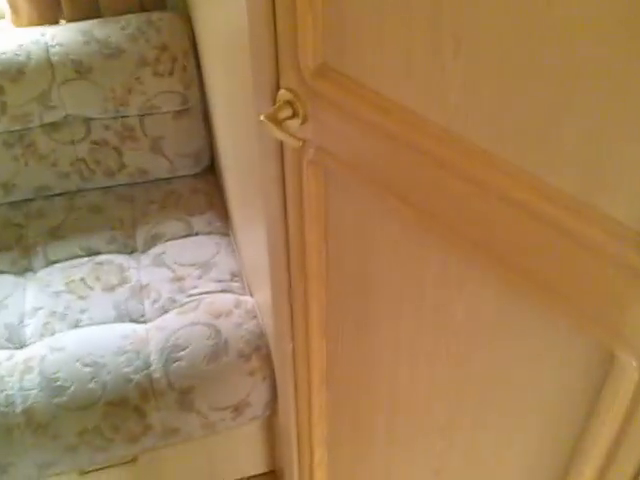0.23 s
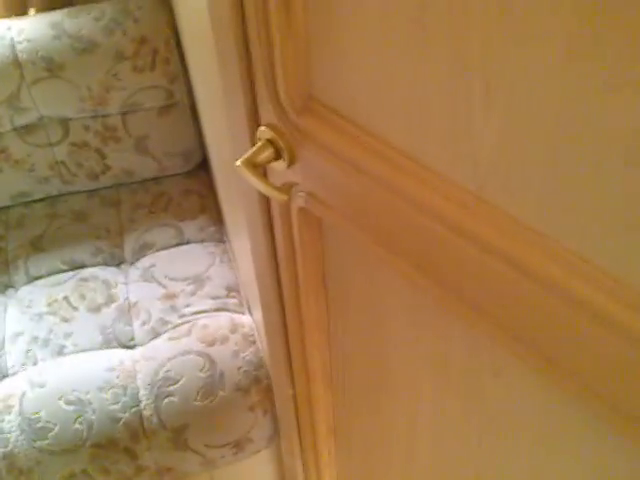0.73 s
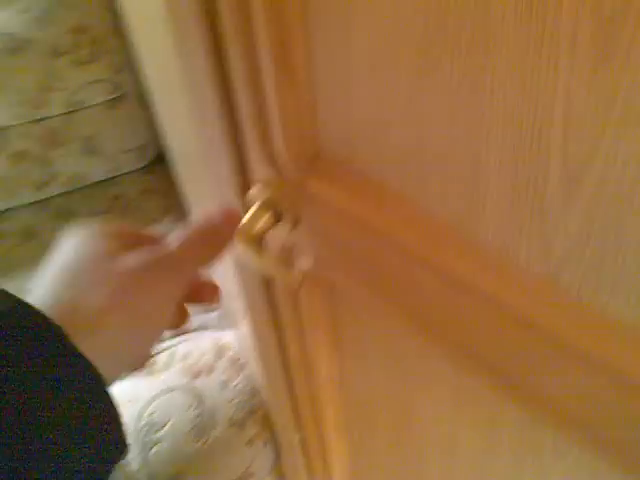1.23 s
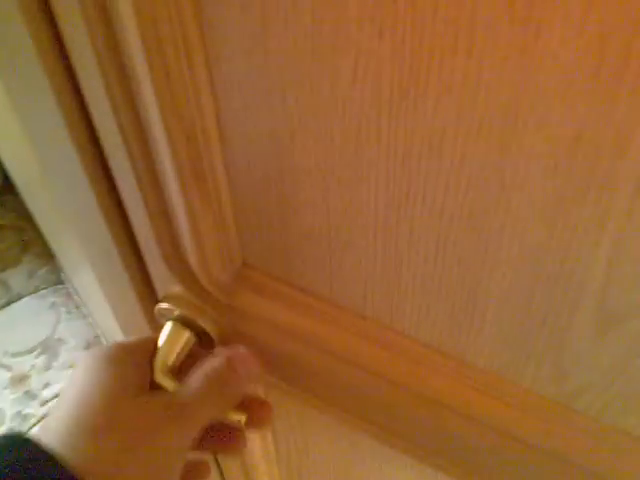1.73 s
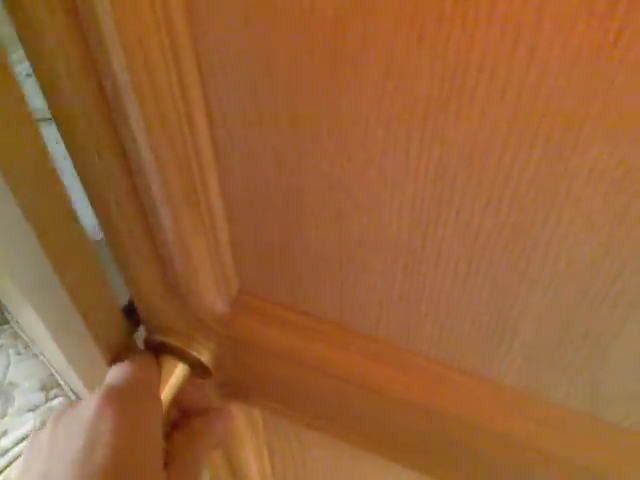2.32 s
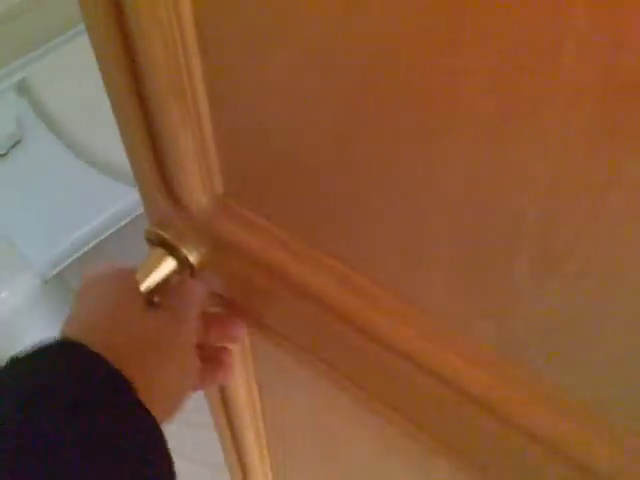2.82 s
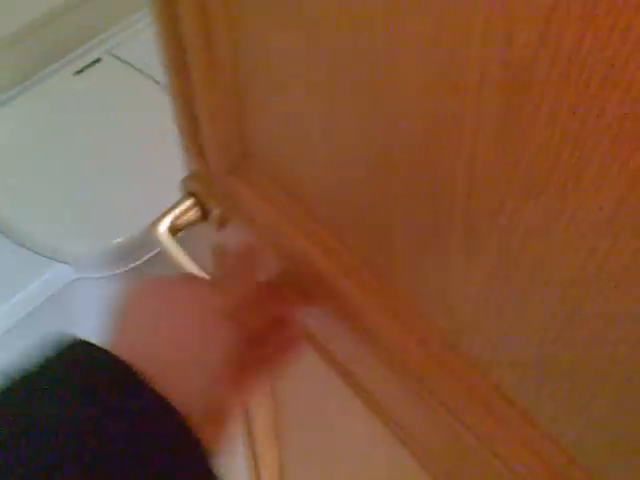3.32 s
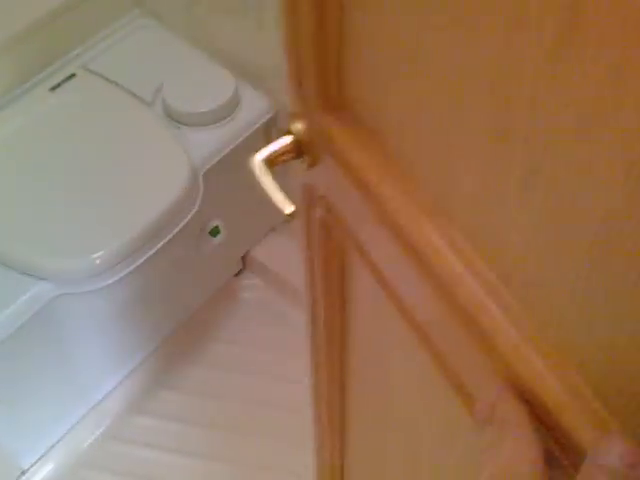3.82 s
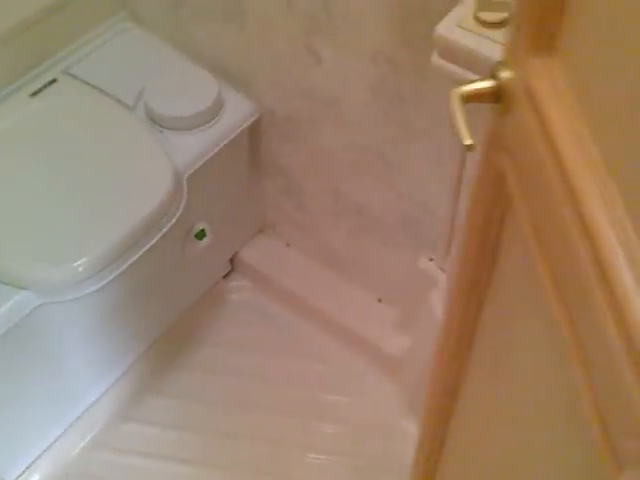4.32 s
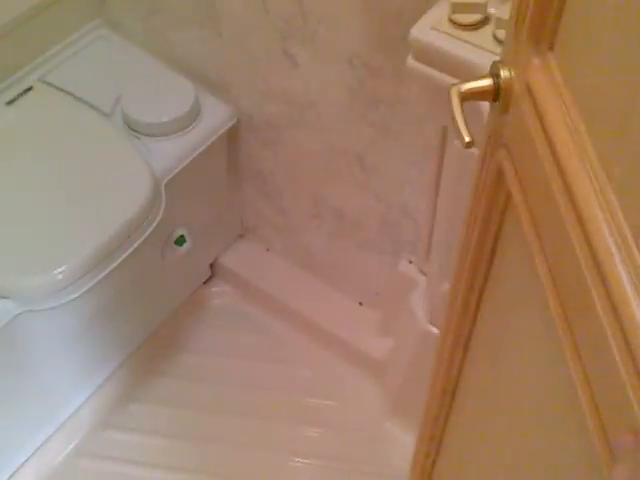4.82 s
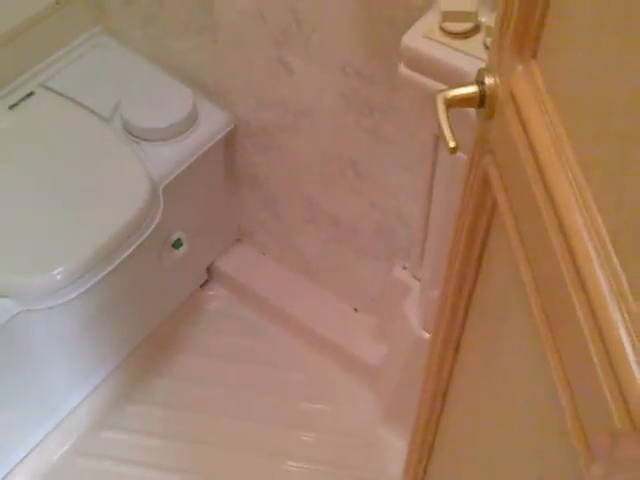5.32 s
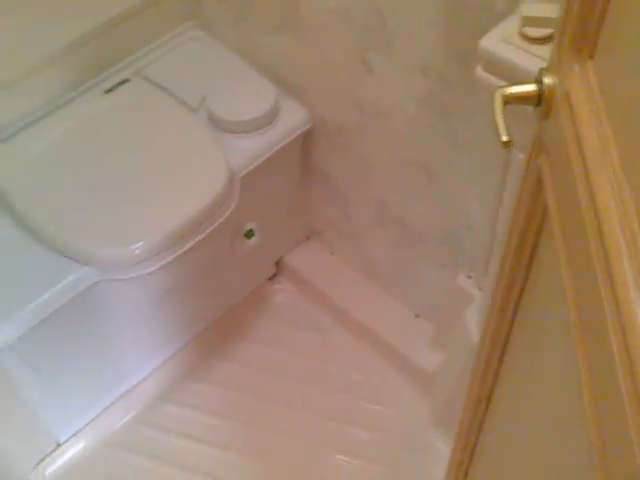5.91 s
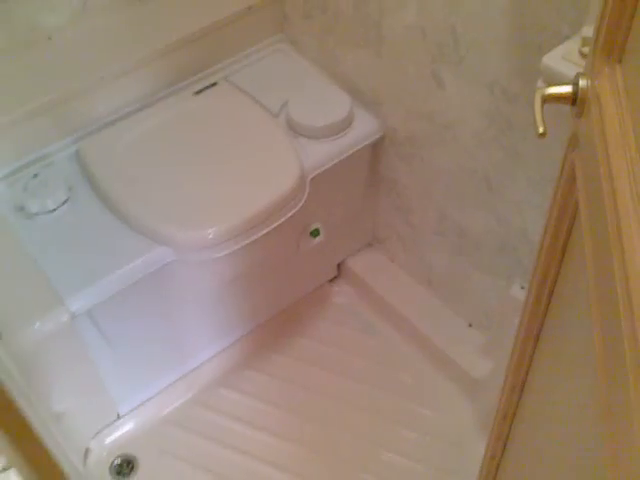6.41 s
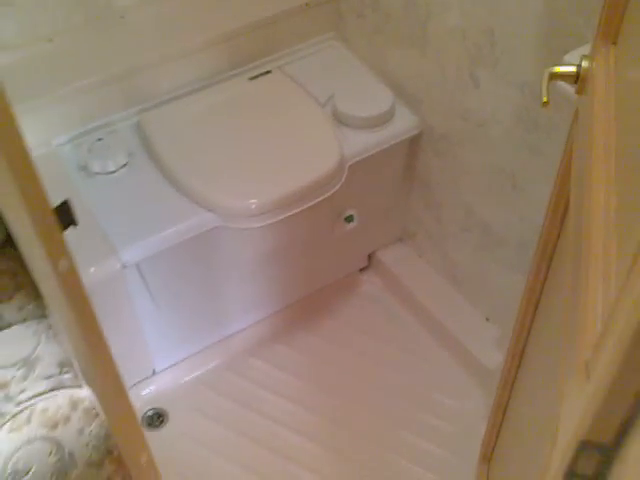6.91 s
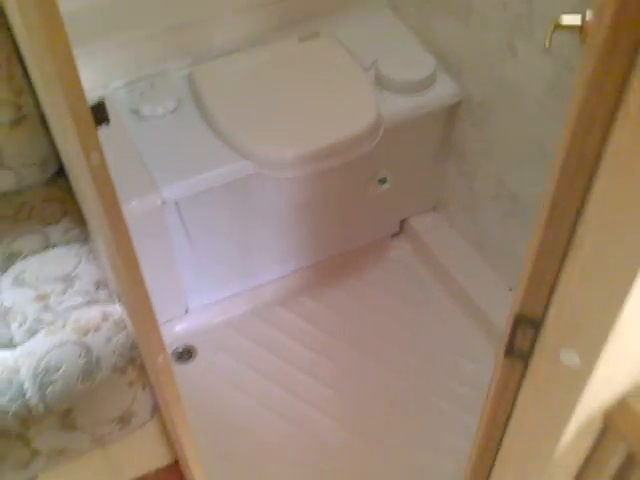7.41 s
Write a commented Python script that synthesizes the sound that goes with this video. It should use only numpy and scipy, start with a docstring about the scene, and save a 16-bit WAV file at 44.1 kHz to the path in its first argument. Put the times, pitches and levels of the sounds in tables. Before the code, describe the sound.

Inside a small caravan, close to a hand-held microphone, cloth rustles and fingers scrape and tick on a plastic case. A lever latch clacks, the light wooden door knocks and drones faintly on its hinges, then bangs hard against its stop, bouncing and shuddering. After a lull, a low floor flex and soft rustle return, with a faint squeak and small knocks.

```python
"""Inside a caravan sleeves rustle as band-shaped friction noise over the rumble of a grip.
A finger first strokes a hand-held camera's plastic case, which ticks as dispersed bending waves.
Latch and lever then clack as damped rings, and the hinges of a light hollow door drone as filtered noise.
The door bangs on its stop, bounces and shudders: decaying noise through its resonances, with low tones.
The rustle nearly vanishes after the bang, then returns as the floor flexes under a step, a low unsteady
tone; a faint squeak follows. A soft ceiling flattens the peaks."""
import sys
import numpy as np
from scipy.fft import rfft, irfft, next_fast_len
from scipy.io import wavfile
from scipy.ndimage import uniform_filter1d, map_coordinates

SR = 44100
rng = np.random.default_rng(int(sys.argv[2]) if len(sys.argv) > 2 else 0)


def file_out(sig):
    """Save sig as 16-bit WAV at sys.argv[1]."""
    # one column per channel
    cols = np.atleast_2d(sig).T
    # limit, then scale
    lim = np.clip(cols, -1, 1)
    pcm = np.round(lim * 32767).astype(np.int16)
    wavfile.write(sys.argv[1], SR, pcm)


N = 338467  # length [samples]

# Rms levels of rustle and scrape, sinking after the bang: (time [s], sleeve level [dB], scrape level [dB])
FRICTION_LEVELS = [(0, -52, -52), (.13, -58.5, -52.5), (.17, -43, -43.5), (.31, -55, -54.5),
                   (.335, -40, -50.5), (.4, -41, -51), (.49, -40, -42), (.515, -39, -40.5),
                   (.55, -36, -30.5), (.64, -43.5, -45.5), (.7, -40.5, -39.5), (.745, -38, -24.5),
                   (.81, -38, -29), (.87, -46.5, -35.5), (1.01, -62, -61), (1.15, -52.5, -59),
                   (1.34, -49, -45.5), (1.48, -50.5, -55), (1.64, -54, -51), (1.89, -48.5, -48.5),
                   (2.13, -48.5, -49.5), (2.24, -47.5, -37), (2.37, -63, -54), (2.77, -44, -48.5),
                   (3.09, -57, -52), (3.32, -55, -56.5), (3.5, -56, -57), (3.56, -40, -46),
                   (3.66, -43, -58), (3.86, -48.5, -58.5), (3.93, -52, -57.5), (4.03, -45.5, -53),
                   (4.16, -50, -53.5), (4.42, -54, -59.5), (4.62, -87, -76.5), (4.93, -72, -80.5),
                   (5.5, -75.5, -67), (5.85, -70, -75), (6.126, -59, -72.5), (6.44, -47, -51),
                   (6.586, -55, -62), (6.83, -52.5, -56.5), (7.03, -56, -62), (7.085, -49, -58),
                   (7.13, -58.5, -62), (7.24, -50, -58), (7.38, -56.5, -63), (7.67, -57, -64)]
# Relative spectrum of the grip's rumble: (frequency [Hz], density [dB per Hz])
RUMBLE_SPECTRUM = [(12, -32), (20, 3), (38, -14), (54, -4), (64, -7.5), (92, -2.5), (190, -9.5),
                   (304, -10.5), (334, -11.5), (372, -18.5), (500, -23.5), (650, -50), (1100, -120)]
# Relative spectrum of sleeve cloth: (frequency [Hz], density [dB per Hz])
CLOTH_SPECTRUM = [(530, -33), (900, -5.5), (1850, -3), (2400, -0.5), (3000, -1), (3570, -5.5), (4540, -11),
                  (9000, -37), (11700, -52), (19800, -120)]
# Relative spectrum of the fizz above sleeve and grip: (frequency [Hz], density [dB per Hz])
FIZZ_SPECTRUM = [(2650, -24), (4500, 4.5), (5680, 1), (6190, 0.5), (9820, -14), (15200, -17),
                 (16000, -32.5)]
# Relative spectrum of scraping fingers: (frequency [Hz], density [dB per Hz])
SCRAPE_SPECTRUM = [(210, -42), (350, -7), (394, 0), (432, -5.5), (630, -2.5), (881, -6.5), (1060, -8),
                   (2600, -17.5), (3380, -47.5), (5720, -120)]
# Quick finger strokes over the case: (time [s], length [s], level before the envelope [dB])
STROKES = [(0.156, 0.101, -42.5)]
# Relative spectrum of a stroke: (frequency [Hz], density [dB per Hz])
STROKE_SPECTRUM = [(500, -23.5), (1200, -4), (1800, 2.5), (2600, -3.5), (3300, -14.5), (4200, -2),
                   (5000, -11.5), (6000, -9.5), (7000, -25.5), (12000, -32.5), (16000, -58.5)]
# Weight shifts that flex the floor: (time [s], rms level [dB], hold [s], t60 [s])
FLOOR_STEPS = [(0.574, -33, .005, .12), (.81, -41, .02, .4), (1.274, -31, .005, 0.089),
               (1.385, -43, .01, 0.34), (6.402, -12.5, 0.0035, 0.17), (6.458, -25.5, .01, 0.32),
               (6.756, -42, 0.0069, .5)]
# Case ticks, clicking 2 ms after the time:
# (time [s], click peak [dB], thump over click [dB], click centre [Hz])
CASE_TICKS = [(0.205, -27, -14, 2010), (0.523, -33, 16, 970), (0.561, -16, -0.5, 764),
              (0.574, -5.5, -3, 777), (0.6, 2.5, -36, 2080), (0.692, -23.5, 1, 1040),
              (0.903, -7.5, -16, 1240), (1.046, -42.5, 12.5, 1250), (1.557, -17.5, 5.5, 1250),
              (1.599, -22.5, 6.5, 1210), (1.652, -21, 6.5, 1990), (1.697, -23, 7.5, 890),
              (1.79, -58, 31.5, 2750), (1.804, -27, 9.5, 2360), (1.847, -23, 5, 1230),
              (1.92, -25.5, 7.5, 1220), (2.059, -26.5, 8.5, 1060), (2.162, -41, 10, 1208),
              (2.174, -26.5, 11, 830), (2.878, -18.5, 0.5, 1580), (7.184, -31.5, 10.5, 2080)]
# Resonances of the case: (frequency [Hz], width [Hz], mean gain [dB])
CASE_MODES = [(1065, 380, 16), (2008, 780, 12.5), (2650, 300, 12), (3187, 350, 13), (4950, 1500, -2),
              (8050, 1400, 0)]
# Latch and lever clacks, and a faint late squeak:
# (time [s], nominal level [dB], favoured low ring [Hz], upper rings' gain [dB])
CLACKS_AND_SQUEAK = [(2.229, -8, 1277, -4.5), (2.248, -53, 1320, -16), (2.268, -40, 1280, -12),
                     (2.282, -34, 1340, -18), (2.305, -31, 1320, -14), (2.324, -19, 1460, -13),
                     (2.612, -25, 1110, -8), (2.632, -30, 1090, -11), (3.042, -23.5, 1380, 4),
                     (3.074, -41, 1305, 9), (3.096, -29.5, 1286, 7.5), (3.578, -30, 1360, -40),
                     (7.233, -62, 1288, 24)]
# Rings that clacks and squeak share: (frequency [Hz], mean level [dB], t60 [s])
LATCH_RINGS = [(1110, -2, 0.051), (1282, 7, 0.017), (1427, -10, 0.098), (2230, 4, 0.014), (2574, -3, 0.03),
               (2960, -9, 0.021), (3060, 1.5, 0.0095), (4650, -15, 0.012), (6800, -48, 0.0064)]
# Drone while the hinges drag: (time [s], rms level [dB])
HINGE_LEVELS = [(2.25, -43), (2.486, -53), (2.902, -46), (3.054, -42.5), (3.11, -34.5), (3.2, -49),
                (3.271, -39.5), (3.33, -60)]
# Relative spectrum of the drone: (frequency [Hz], density [dB per Hz])
DRONE_SPECTRUM = [(170, -54), (195, -3), (230, -20), (315, -16), (340, -3.5), (365, -23.5), (420, -64.5)]
# Jolts that flex the door leaf: (time [s], rms level [dB], hold [s], t60 [s])
LEAF_JOLTS = [(1.557, -38, .01, 0.24), (1.7, -32, 0.0043, 0.12), (1.804, -42, 0.19, .2),
              (2.102, -32, .03, 0.65), (2.261, -15, 0.0037, 0.14), (2.356, -24.5, .005, 0.12),
              (2.45, -32.5, .005, .25), (2.552, -33, .005, 0.45), (2.69, -28.5, 0.028, 0.37),
              (2.785, -29, 0.037, 0.33), (2.915, -29.5, 0.023, .3), (3.108, -31.5, .005, 1.8),
              (3.694, -37, .005, 0.44), (4.058, -43, 0.0094, 0.17), (4.243, -42, .01, 0.16),
              (4.42, -8, 0.011, 0.66), (4.965, -20, .02, 0.58), (5.031, -17.5, 0.0051, 0.2),
              (5.146, -20, 0.0056, 0.16), (5.215, -22.5, .22, 0.5), (5.657, -35.5, .16, 0.83),
              (7.25, -38.5, 0.012, 0.68)]
# Round hollow thumps of contacts, slam and bounces, each at its own pitch:
# (time of peak [s], frequency [Hz], peak [dB], t60 [s])
ROUND_THUMPS = [(2.26, 188.5, -24.5, 0.32), (3.546, 282, -17, 0.067), (3.585, 325, -23.5, 0.1),
                (4.051, 250, -36.5, 0.15), (4.45, 150.1, -11.5, 0.48), (5.031, 201, -24, 0.11),
                (5.124, 206, -18, 0.1), (5.185, 203, -21.5, 0.082), (5.212, 199, -22.5, 0.14),
                (6.399, 121, -33.5, 0.16), (7.22, 96, -35, 0.43), (7.29, 302, -30.5, 0.066),
                (7.52, 304, -27, 0.082)]
# Interval of the bounces on the stop: (start [s], end [s])
STOP_INTERVAL = (4.9, 5.9)
# Panel modes the bounces strike: (frequency [Hz], mean level over the knock's nominal one [dB], t60 [s])
STOP_MODES = [(520, -5, 0.087), (931, -6, 0.063), (1426, -14, 0.056)]
# Knocks on door and frame: (time [s], nominal level [dB], nominal thud over it [dB], thud centre [Hz],
# nominal bite over it [dB], nominal t60 near 1 kHz [s])
DOOR_KNOCKS = [(1.259, -29, 7.5, 183, -24, 0.064), (1.353, -25, -8.5, 232, -1.5, .21),
               (2.242, -29.5, -2.5, 175, 6, 0.4), (2.383, -34.5, -29, 143, 4, 0.068),
               (2.61, -35, 4.5, 146, 1, 0.2), (3.045, -26.5, 1, 327, 3.5, 0.17),
               (3.1, -26, -11, 196, 1.5, 0.21), (3.218, -35.5, -7, 197, 3.5, 0.23),
               (3.364, -37, -5, 170, -16, 0.045), (3.524, -27, 6.5, 305, -16, 0.14),
               (3.543, -39.5, 14, 298, -16, 0.17), (3.575, -31, -0.5, 315, -14, 0.29),
               (3.663, -32.5, 1, 190, -11, 0.073), (4.384, 0, -8, 170, -2.5, 0.065),
               (4.399, -5.5, -9, 170, -2.5, 0.072), (4.412, -4.5, -19.5, 359, -0.5, 0.076),
               (4.423, -4, -20.5, 359, -2.5, 0.049), (4.439, -7.5, -6, 156, -1.5, 0.11),
               (4.48, -13.5, -9, 203, -1.5, 0.12), (4.519, -25.5, 5, 157.5, -4, 0.2),
               (4.649, -46.5, 23, 147, -25.5, .13), (4.748, -65.5, 26, 218, -12, .13),
               (4.946, -21, -1.5, 159, -7, 0.19), (4.986, -23, -1, 302, -2.5, 0.12),
               (5.019, -36, 16, 205, -15, .13), (5.076, -58, 29, 205, -19.5, 0.4),
               (5.123, -22, 5, 210, -12, 0.15), (5.178, -29, 11, 208.5, -22, 0.17),
               (5.197, -29.5, 1.5, 200, -42, 0.15), (5.236, -36.5, -2.5, 248, -14.5, 0.093),
               (5.283, -26.5, 5.5, 490, -18.5, 0.18), (5.329, -33.5, 5.5, 142.3, -30.5, 0.13),
               (5.385, -26.5, -10.5, 163.7, -24.5, 0.13), (5.418, -38, 0.5, 244, -41.5, 0.3),
               (5.46, -36, 7.5, 159, -28.5, 0.087), (5.501, -32, 9.5, 336, -22, .1),
               (5.583, -47, 20, 409, -37, .09), (5.63, -48, 10.5, 249.6, -38, 0.17),
               (5.744, -40.5, 3.5, 141.4, -47, .1), (5.775, -49.5, 7, 142.6, -23, 0.11),
               (6.393, -39, 6.5, 303, 7.5, 0.12), (7.284, -29.5, -0.5, 310, -4, .2),
               (7.512, -28.5, 0, 307, -4.5, 0.17)]
# Resonances of the hollow door: (frequency [Hz], width [Hz], gain added to the direct blow [dB])
DOOR_MODES = [(149.6, 30, 7.5), (200, 14, 12.5), (337.5, 21, 13), (502, 67, 12.5), (838, 89, 4.5),
              (930, 35, 8), (1225, 60, 4.5), (1430, 50, 5), (1810, 10, -2), (2180, 29, -9.5),
              (2770, 80, -2), (3920, 260, -4.5)]
# Relative spectrum of a hard knock: (frequency [Hz], density [dB per Hz])
BLOW_SPECTRUM = [(41, -32.5), (70, 19), (118, 2), (152, -4.5), (554, -18), (834, -13.5), (1170, -16.5),
                 (1470, -15.5), (6300, -29), (14900, -56), (16000, -71)]
# Damping of a knock: (frequency [Hz], factor on its nominal t60 [ratio])
DAMPING_FACTORS = [(100, 3), (400, 1.47), (1000, 1.04), (4000, 1.25), (12000, 0.98)]

FIZZ_UNDER_SLEEVE_DB, FIZZ_UNDER_GRIP_DB = 16, 22.5
# mean rumble at a scrape of -48.5 dB, its growth per dB of scrape, its random sway
RUMBLE_DB, RUMBLE_PER_DB, RUMBLE_SWAY_DB = -43.5, 0.6732, 4.5
# mean panel tremble at a scrape of -50 dB, its change per dB of scrape, its random sway
IDLE_DB, IDLE_PER_DB, IDLE_SWAY_DB = -56, -0.03, 4
FLOOR_HZ, LEAF_HZ, SWELL_S = 40.4, 51.4, .035
SPREAD = .095  # dispersion of the bending wave [s*sqrt(Hz)]
THUMP_SWELL_CYCLES = 4.5
# nominal treble of a knock is the larger of two lines: one rising with its level, one with its bite
HARD_TREBLE_DB, TREBLE_PER_DB = -9, 1.1
SOFT_TREBLE_DB, TREBLE_PER_BITE = -33.5, 1
CEILING, TOP_HZ = .74, 15900  # soft limit [full scale] and band limit


def amp(db):
    """Level is logarithmic: 20 dB is a factor of ten in amplitude."""
    return 10 ** (np.asarray(db) / 20)


def unit(x):
    """Normalisation to an rms of 1."""
    return x / np.sqrt(np.mean(x ** 2) + 1e-20)


def along(points, hz):
    """Interpolation of (frequency [Hz], value) points on a logarithmic frequency axis."""
    f, v = np.transpose(points)
    return np.interp(np.log(hz + 1), np.log(f + 1), v)


def curves(rows):
    """Linear interpolation in time: one curve for each column after the first."""
    s, *columns = np.transpose(rows)
    return [np.interp(np.arange(N) / SR, s, column) for column in columns]


def wobble(rate):
    """Smooth random modulation: a spline through random knots, rate of them a second."""
    knots = rng.standard_normal(int(N * rate / SR) + 4)
    return map_coordinates(knots, [np.arange(N) * rate / SR])


def phase_walks(count, size):
    """Phase diffusion: random walks gaining a radian rms in a millisecond, then smoothed."""
    walk = np.cumsum(rng.standard_normal((count, size)), axis=1) / np.sqrt(SR / 1000)
    smooth = uniform_filter1d(walk, size=30, axis=1)
    return uniform_filter1d(smooth, size=30, axis=1)


def filtered(x, response):
    """Linear filtering: the spectrum is multiplied by a response of frequency."""
    m = next_fast_len(N + 8192)
    return irfft(rfft(x, m) * response(np.fft.rfftfreq(m, 1 / SR)), m)[..., :N]


def add(track, s, sound):
    """Superposition: a sound is summed into the track from time s."""
    part = track[round(s * SR):][:len(sound)]
    part += sound[:len(part)]


def rub(spectrum, grain_db, rate):
    """Stick-slip friction: noise of rms 1 whose level jumps as surfaces catch and slip."""
    rough = rng.standard_normal(N) * amp(grain_db * wobble(rate))
    return unit(filtered(rough, lambda hz: amp(along(spectrum, hz))))


def grip_rumble():
    """Low-frequency friction: the rumble of the grip grows less than its scrape does."""
    _, scrape_db = curves(FRICTION_LEVELS)
    rumble_db = RUMBLE_DB + RUMBLE_PER_DB * (scrape_db + 48.5) + RUMBLE_SWAY_DB * wobble(7.6)
    return amp(rumble_db) * rub(RUMBLE_SPECTRUM, grain_db=1.5, rate=60)


def sleeve_rustle():
    """Fibre friction: brushing sleeves make mid-band noise that nearly vanishes after the bang."""
    cloth_db, _ = curves(FRICTION_LEVELS)
    return amp(cloth_db) * rub(CLOTH_SPECTRUM, grain_db=1.5, rate=54)


def friction_fizz():
    """Incoherent addition: the treble powers of sleeve and grip sum to one fizz."""
    cloth_db, scrape_db = curves(FRICTION_LEVELS)
    sleeve_fizz = amp(cloth_db - FIZZ_UNDER_SLEEVE_DB)
    grip_fizz = amp(scrape_db - FIZZ_UNDER_GRIP_DB)
    return np.hypot(sleeve_fizz, grip_fizz) * rub(FIZZ_SPECTRUM, grain_db=1.5, rate=80)


def finger_scrape():
    """Dry friction: scraping fingers make fast-grained noise."""
    _, scrape_db = curves(FRICTION_LEVELS)
    return amp(scrape_db) * rub(SCRAPE_SPECTRUM, grain_db=2, rate=330)


def finger_strokes():
    """Sliding contact: fluttering noise starts at once, grows, and drops to a faint residue."""
    t, stroke = np.arange(N) / SR, np.zeros(N)
    for s, length, db in STROKES:
        corners = [s, s + 0.002, s + length - .01, s + length]
        stroke += amp(db) * np.interp(t, corners, [0, 0.63, 0.86, 0.017])
    return stroke * rub(STROKE_SPECTRUM, grain_db=3, rate=45)


def panel_flexing(hz, jolts):
    """Flexural vibration: an unsteady low tone with a weak overtone; jolts swell, hold and decay."""
    t = np.arange(N) / SR
    _, scrape_db = curves(FRICTION_LEVELS)
    db = IDLE_DB + IDLE_PER_DB * (scrape_db + 50) + IDLE_SWAY_DB * wobble(35)
    for s, level_db, hold, t60 in jolts:
        swell_db = 20 * np.log10(np.clip(1 + (t - s) / SWELL_S, 1e-5, 1))
        fall_db = 60 * np.maximum(t - s - hold, 0) / t60
        db = np.maximum(db, level_db + swell_db - fall_db)
    phase = 2 * np.pi * np.cumsum(hz * (1 + 0.047 * wobble(25))) / SR
    tone = np.sin(phase) + 0.019 * np.sin(3 * phase + wobble(1.3))
    return np.sqrt(2) * amp(db + 1.1 * wobble(26)) * tone


def case_ticks():
    """Dispersion: bending-wave speed grows with root frequency, so a tick falls from click to thump."""
    out, size, lead = np.zeros(N), 4096, .005  # lead [s] leaves room before the arrival
    hz = np.fft.rfftfreq(size, 1 / SR) + 1
    travel = np.exp(-4j * np.pi * SPREAD * np.sqrt(hz) - 2j * np.pi * hz * lead)

    def bump(centre, octaves):
        return np.exp(-.5 * (np.log2(hz / centre) / octaves) ** 2)

    def pulse(spectrum):
        wave = irfft(spectrum)
        return wave / np.abs(wave).max()

    for s, db, thump_db, click_hz in CASE_TICKS:
        case = .15  # sound passing between the resonances
        for k, (centre, width, gain_db) in enumerate(CASE_MODES):
            gain = (-1) ** k * amp(gain_db + rng.normal(0, 2.5))
            loss = 1j * hz * width
            case = case + gain * loss / (centre * centre - hz * hz + loss)
        click = pulse(bump(click_hz, 1.5) * travel * case)
        thump = pulse(-bump(160.5, 0.92) * travel)
        start = s + .002 - lead - SPREAD / np.sqrt(click_hz)
        add(out, start, amp(db) * (click + amp(thump_db) * thump))
    return out


def latch_clacks_and_squeak():
    """Damped free vibration: brass latch parts ring briefly in wood; such rings also make a late squeak."""
    out, t = np.zeros(N), np.arange(SR // 10) / SR
    hz, level_db, t60 = np.transpose(LATCH_RINGS)[..., None]
    rise = (1 - np.exp(-t / .0004)) ** 2
    for s, db, favoured_hz, upper_db in CLACKS_AND_SQUEAK:
        chance_db = rng.normal(0, 0.5, hz.shape)
        low_db = -30 * np.abs(np.log2(hz / favoured_hz))  # 30 dB lost per octave from the favoured ring
        place_db = np.where(hz > 1800, upper_db, low_db)
        size = amp(level_db + chance_db + place_db - 60 * t / t60)
        rattle = 0.55 * phase_walks(len(hz), len(t))  # loose parts blur each ring
        rings = size * np.sin(2 * np.pi * hz * t + rattle)
        add(out, s, amp(db) * rise * rings.sum(0))
    return out


def hinge_drone():
    """Friction-driven resonance: dragging hinges feed two low resonances of the swinging door."""
    before = (HINGE_LEVELS[0][0] - .02, -120)
    after = (HINGE_LEVELS[-1][0] + .1, -120)
    db, = curves([before, *HINGE_LEVELS, after])
    return amp(db) * rub(DRONE_SPECTRUM, grain_db=-2.0, rate=76)


def round_thumps():
    """Resonant build-up and decay: a low tone swells for a few cycles, then rings out at its own pitch."""
    out, t = np.zeros(N), np.arange(-SR // 10, SR // 2) / SR
    for s, hz, db, t60 in ROUND_THUMPS:
        swell = np.clip(1 + t * hz / THUMP_SWELL_CYCLES, 0, 1) ** 2
        ring = np.sin(2 * np.pi * hz * t + .3 * phase_walks(1, len(t))[0])
        add(out, s + t[0], amp(db - 60 * np.maximum(t, 0) / t60) * swell * ring)
    return out


def stop_rings():
    """Modal excitation: each bounce on the stop sets the same few panel modes ringing."""
    out, t = np.zeros(N), np.arange(SR // 5) / SR
    hz, level_db, t60 = np.transpose(STOP_MODES)[..., None]
    rise = 1 - np.exp(-t / 0.0043)
    for s, db, *_ in DOOR_KNOCKS:
        if STOP_INTERVAL[0] < s < STOP_INTERVAL[1]:
            chance_db = rng.normal(0, 2.5, hz.shape)
            size = amp(db + level_db + chance_db - 60 * t / t60) * rise
            blur = 0.27 * phase_walks(len(hz), len(t))
            add(out, s, (size * np.sin(2 * np.pi * hz * t + blur)).sum(0))
    return out


def door_knocks():
    """Impact response: each blow excites the door's resonances, and every band decays at its own rate."""
    out, size = np.zeros(N), 16384
    hz, t = np.fft.rfftfreq(size, 1 / SR) + 1, np.arange(size) / SR
    centres = np.geomspace(80, 14000, 15)
    bands = np.exp(-(np.log(hz / centres[:, None]) / np.log(centres[1] / centres[0])) ** 2)
    bands /= bands.sum(0)
    lift = 1 + sum(amp(db) / np.hypot(1, 2 * (hz - c) / width) for c, width, db in DOOR_MODES)
    colour = amp(along(BLOW_SPECTRUM, hz)) * lift
    middle = (hz > 600) & (hz < 2000)  # the band that sets the reference level
    colour /= np.sqrt(2 * np.sum(colour[middle] ** 2)) / size
    rise = 1 - np.exp(-t * centres[:, None] / 0.5)  # a band needs a cycle or two to speak
    for s, db, thud_db, thud_hz, bite_db, t60 in DOOR_KNOCKS:
        hard_db = HARD_TREBLE_DB + TREBLE_PER_DB * db
        soft_db = SOFT_TREBLE_DB + TREBLE_PER_BITE * bite_db
        treble_db = max(hard_db, soft_db)
        tilt = [(thud_hz / 4, thud_db - 22), (thud_hz / 2, thud_db - 10.0), (thud_hz, thud_db + 5.0),
                (600, 3), (1200, 3), (2800, bite_db + 9.5),
                (7500, treble_db + 18.5), (14000, treble_db + 26.0)]
        tilt_db = along(tilt, centres)[:, None]
        random_phase = np.exp(2j * np.pi * rng.random(len(hz)))
        shake = irfft(random_phase * colour * bands, size)
        life = max(t60, .01) * along(DAMPING_FACTORS, centres)[:, None]
        decaying = amp(tilt_db - 60 * t / life) * rise * shake
        add(out, s, amp(db - 10) * decaying.sum(0))
    return out


def scene():
    """Superposition of all sources, from the background to the door."""
    friction = grip_rumble() + sleeve_rustle() + friction_fizz() + finger_scrape() + finger_strokes()
    floor = panel_flexing(FLOOR_HZ, FLOOR_STEPS)
    fittings = case_ticks() + latch_clacks_and_squeak() + hinge_drone()
    door = panel_flexing(LEAF_HZ, LEAF_JOLTS) + round_thumps() + stop_rings() + door_knocks()
    return (friction + floor + fittings + door)[None]


def record(dry):
    """Saturation and band limiting: peaks bend under a ceiling, and the highest treble is removed."""
    squashed = dry / (1 + np.abs(dry / CEILING) ** 6) ** (1 / 6)
    return filtered(squashed, lambda hz: hz < TOP_HZ)


dry = scene()
out = record(dry)
file_out(out)
```